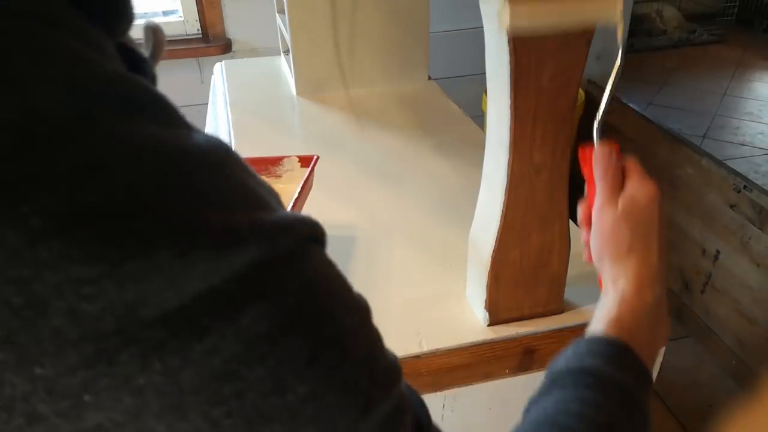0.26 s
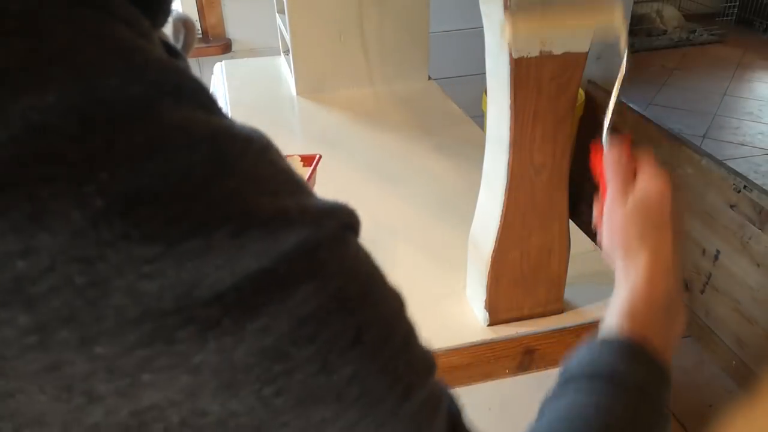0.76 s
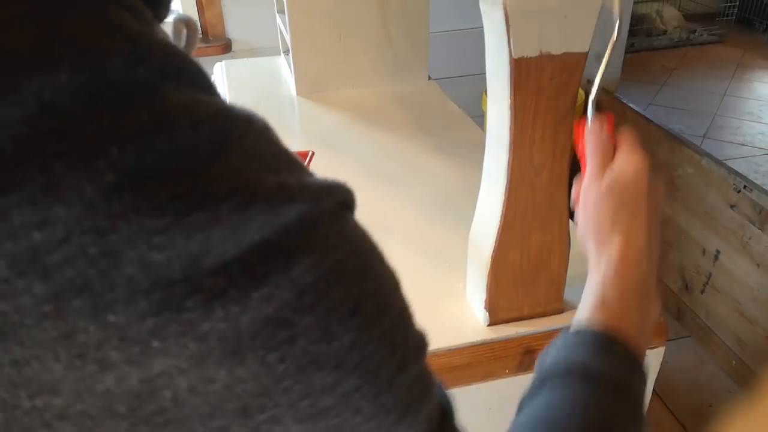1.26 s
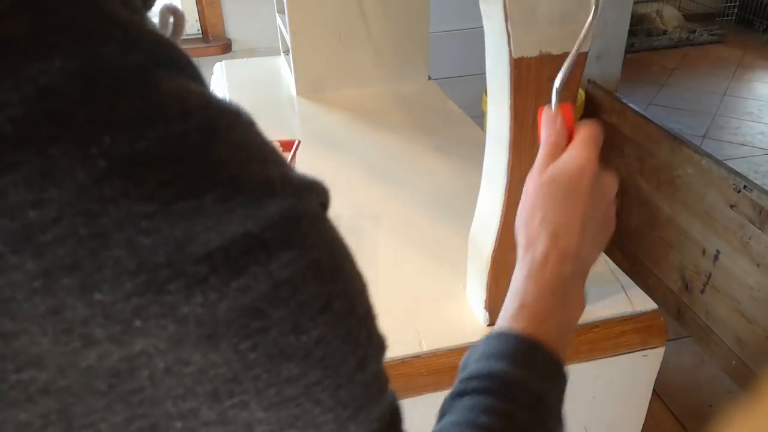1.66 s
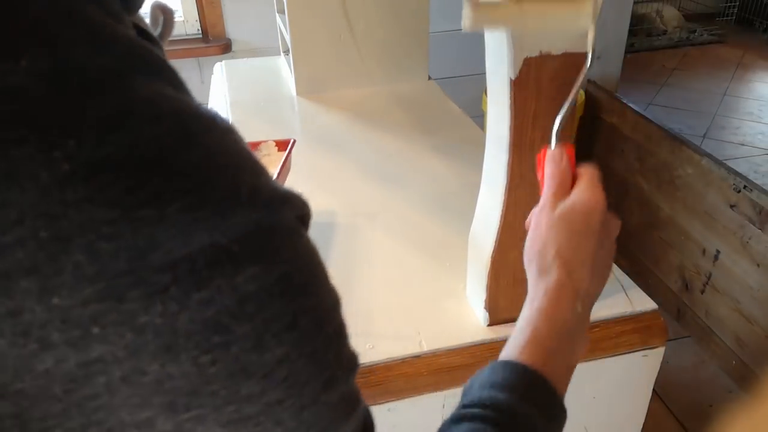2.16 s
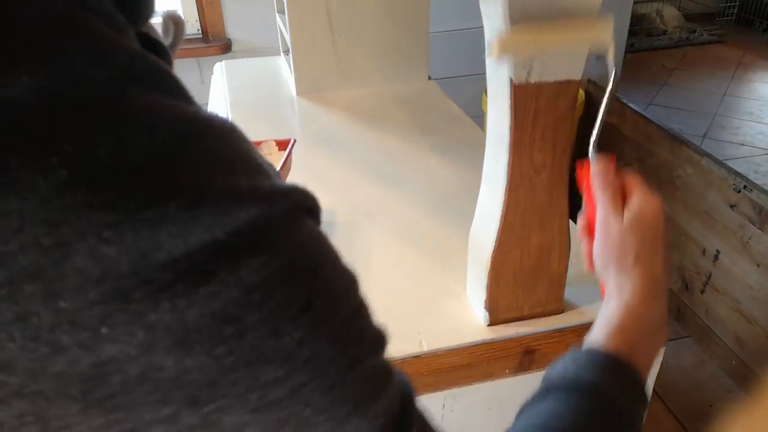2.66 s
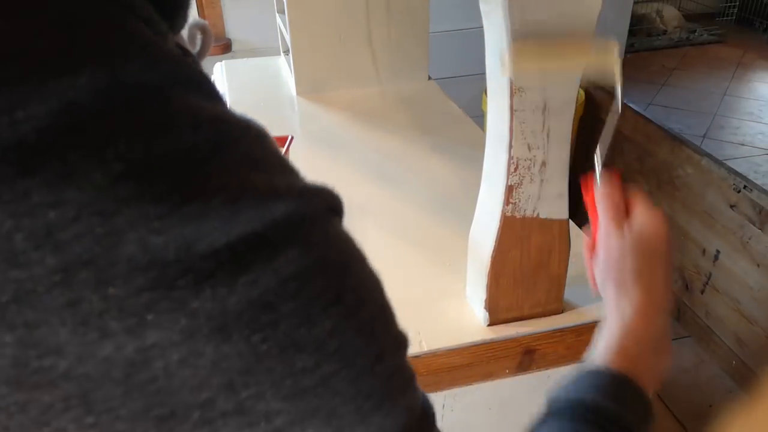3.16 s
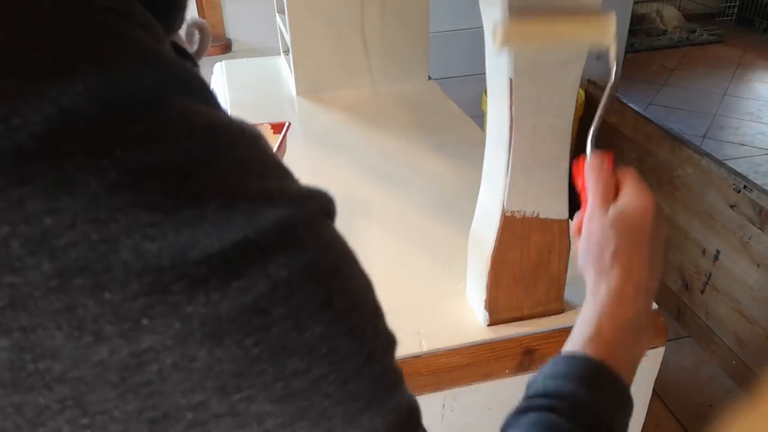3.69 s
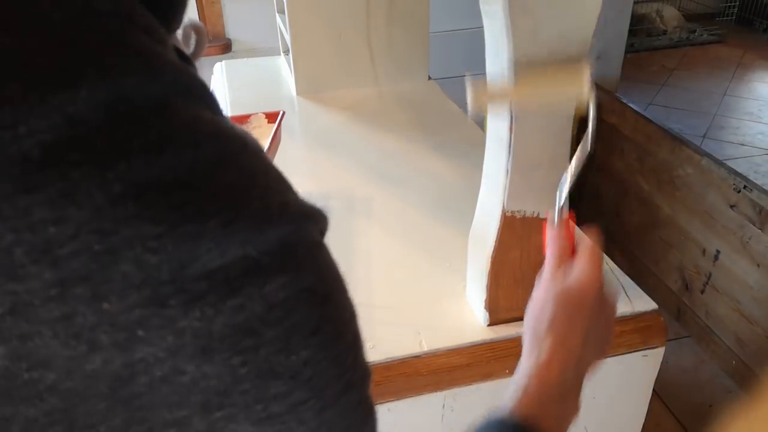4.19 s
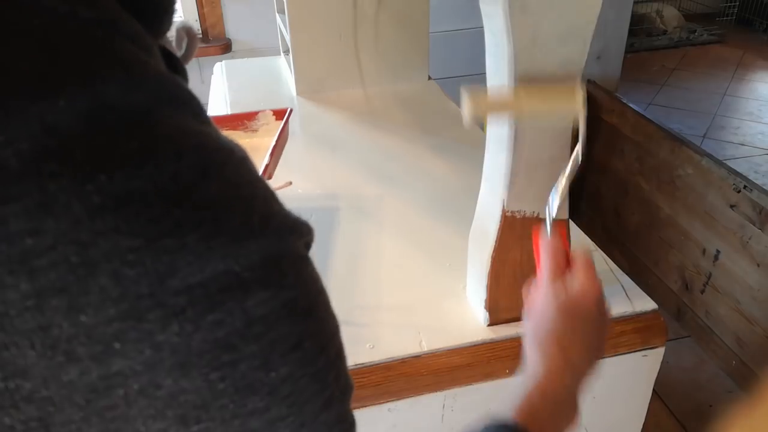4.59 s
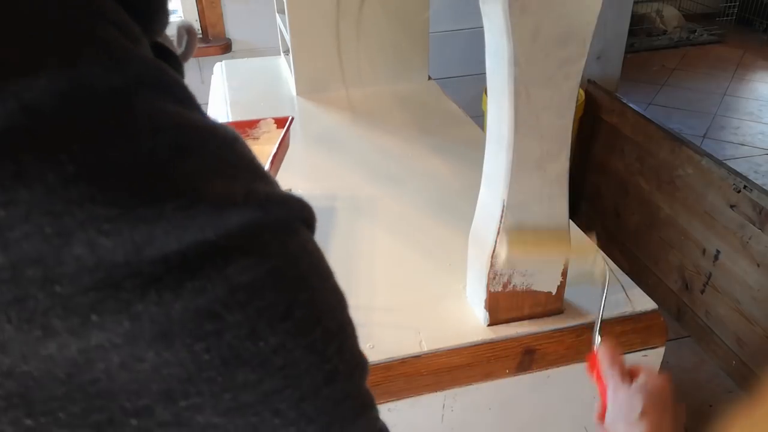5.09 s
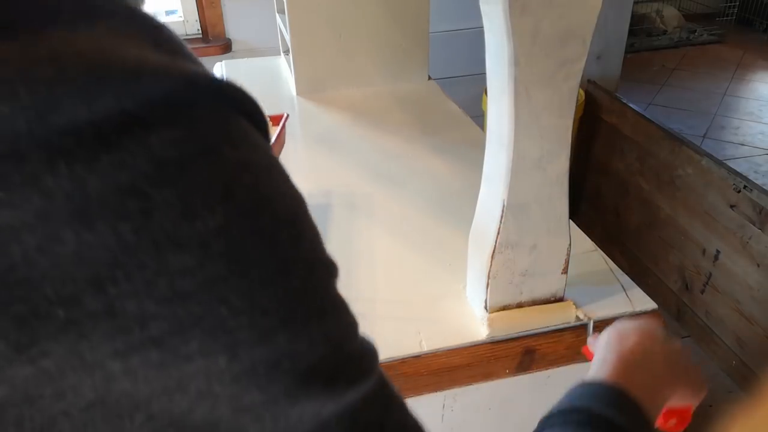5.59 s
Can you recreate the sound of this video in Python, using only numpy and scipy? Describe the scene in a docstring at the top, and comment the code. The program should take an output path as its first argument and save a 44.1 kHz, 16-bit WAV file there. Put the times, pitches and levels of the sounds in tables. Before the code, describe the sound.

A small paint roller works up and down a wooden cupboard post, close to the microphone in a hard-walled room. Its plastic sleeve clacks and rattles on the wire axle while wet paint hisses softly and the hollow wood booms faintly. After a short lull of light rubbing, the strokes resume and peak late. The roller then knocks onto a shelf, followed by soft low thuds.

```python
"""A small paint roller works up and down a wooden cupboard post indoors, close to a two-port camera.
From the first strokes its plastic sleeve clacks and rattles on the wire axle, wet paint hisses as it
peels and the hollow cupboard booms under the pressure. After 1.3 s the idling sleeve only rubs lightly;
the strokes resume at 2.2 s and are loudest near 4.8 s. At 5.4 s the roller lands on the shelf, then the
cupboard rocks on the floor. Throughout, a hard-walled room answers over a mains hum."""
import sys
import numpy as np
from scipy import signal
from scipy.fft import rfft, irfft, next_fast_len
from scipy.io import wavfile
from scipy.ndimage import uniform_filter1d, map_coordinates

SR = 44100
rng = np.random.default_rng(int(sys.argv[2]) if len(sys.argv) > 2 else 0)


def file_out(sig):
    """Save sig as 16-bit WAV at sys.argv[1]."""
    # one column per channel
    cols = np.atleast_2d(sig).T
    # limit, then scale
    lim = np.clip(cols, -1, 1)
    pcm = np.round(lim * 32767).astype(np.int16)
    wavfile.write(sys.argv[1], SR, pcm)


N = 257984

# Clacks of the sleeve; the one at 3.001 s is a wall echo of the clack just before:
# t/s, level/dB, knock f/Hz, hardness/dB, wire ring/dB
SLEEVE_CLACKS = [(0.011, -47, 1280, -17, -40.5), (0.145, -47, 1360, -9, -35), (0.211, -16, 1300, 0, -22),
                 (0.319, -34.5, 1420, -7, -14), (0.355, -37.5, 1260, -9, -10),
                 (0.4439, -31.5, 1350, -3.5, -44), (0.574, -33, 1510, -10, -42),
                 (0.594, -31.5, 1630, -15, -44), (0.7611, -21, 1120, -0.5, -13),
                 (0.7637, -25.5, 1350, -2.5, -33), (0.944, -25, 1640, -11, -37),
                 (1.115, -23.5, 1200, -11, -28), (2.267, -33, 1240, -7, -36),
                 (2.334, -23.5, 1234, -11.5, -38), (2.35, -39, 1090, 13, -25), (2.429, -34, 1770, -11, -33),
                 (2.4393, -35, 1610, -11, -30), (2.476, -25, 1930, 4.5, -5),
                 (2.596, -32.5, 1250, -1.5, -28), (2.982, -40, 1445, 1.5, -26),
                 (2.994, -25.5, 1550, 1.5, -4.5), (3.0013, -29.5, 1390, 5.5, -12),
                 (3.0565, -27.5, 1560, -12, -28), (3.0791, -24.5, 1060, -3.5, -23),
                 (3.083, -28.5, 1290, 1, -11), (3.103, -38, 1090, -10, -28), (3.122, -39, 1180, -21, -28),
                 (3.481, -45, 1440, -11, -15), (3.522, -32.5, 1360, -28, -28),
                 (3.5278, -16.5, 1530, -2.5, -10), (3.543, -27, 1600, 2.5, -10),
                 (3.58, -25.5, 1200, -4, -8), (3.601, -25.5, 1090, -8, -23), (3.605, -29.5, 1440, 12, -7),
                 (3.801, -41, 1410, -33, -44), (3.827, -42, 1230, -17, -40),
                 (4.4413, -47.5, 1220, -5.5, -51), (4.623, -34.5, 1830, -1.5, -40),
                 (4.714, -30, 1560, -20, -36), (4.7508, -6, 1620, -4, -10.5), (4.870, -14, 1320, 5.5, -7.5),
                 (4.8752, -14.5, 1580, -18, -24), (4.947, -24, 1440, -4.5, -15),
                 (5.117, -37.5, 1980, -14, -33), (5.399, -46, 1440, 0, -35),
                 (5.4148, -23.5, 1530, -10, -28), (5.4175, -12.5, 1560, -4.5, -21),
                 (5.558, -25, 1480, -11, -45)]
# Timbre along the post, brighter high up: t/s, sleeve f/Hz, crack at hardness 0/dB, low sleeve mode/dB
SLEEVE_TIMBRE = [(0, 3010, -14.5, -7.5), (2.5, 3070, -10.5, -5), (2.999, 2960, -25, -24),
                 (5.8, 2850, -16, -8)]
# First wall reflections: delay/s, left level/dB, right level/dB
WALL_ECHOES = [(.0059, -15, -11.5), (.0097, -12, -10.5), (.0159, -16, -24)]
# The left port hears more of the sleeve's treble: f/Hz, left minus right/dB
SLEEVE_BALANCE = [(700, 9), (1300, -2), (2400, 2), (4400, 2.5), (8000, 12.5)]
def clacks():
    """Impact excitation: the harder the contact, the shorter the knock and the stronger the treble."""
    out = np.zeros((2, N + SR))
    when, sleeve_hz, crack_db, low_db = np.transpose(SLEEVE_TIMBRE)
    crack = click(5270, life=0.00023)
    low_mode = click(2270, life=0.0006)
    edge = np.roll(click(7700, life=0.00006), 12)  # the contact breaks at the crest of the blow
    for start, db, hz, hard_db, wire_db in SLEEVE_CLACKS:
        sleeve = click(np.interp(start, when, sleeve_hz) * (1 + 0.04 * rng.standard_normal()), 0.00036)
        sleeve += amp(np.interp(start, when, low_db)) * low_mode
        wire = amp(wire_db) * click(4330 * (1 + 0.008 * rng.standard_normal()), life=0.00076)
        cycles_to_crest = 0.4 + 0.0633 * max(-hard_db, 0)  # soft taps ring longer
        knock = click(hz, life=cycles_to_crest / hz)
        bright_db = 0.72 * hard_db
        blow = knock - amp(hard_db) * sleeve + amp(np.interp(start, when, crack_db) + bright_db) * crack
        direct = blow + amp(bright_db - 27) * edge + amp(-7) * wire  # the wire points away from the ports
        path = room_tail(onset=0.0043)
        for delay, *wall_db in WALL_ECHOES:
            path[:, round(delay * SR)] += amp(wall_db)
        path *= amp([[-1.5], [-3.5]])  # left, right
        heard = signal.fftconvolve(path, (blow + wire)[None], axes=1)
        heard[0, :len(direct)] += direct
        heard[1, 3:len(direct) + 3] += direct  # the right port lies a little further away
        out[:, round(start * SR):][:, :heard.shape[1]] += amp(db) * heard
    return tilted(out[:, :N], SLEEVE_BALANCE)


def click(hz, life):
    """Damped oscillation: a blow swells to its crest in life seconds, then rings down."""
    age = np.arange(SR // 25) / SR / life
    shape = age * age * np.exp(-2 * age) * np.sin(2 * np.pi * hz * life * age)
    return shape / np.abs(shape).max()


def small_radiator(x):
    """Radiation efficiency: an object smaller than the wavelength gives off little bass."""
    return filtered(x, lambda hz: hz ** 6 / np.sqrt(hz ** 12 + 880. ** 12))


# Roller strokes: t/s, length/s, paint level/dB, chatter level/dB, boom level/dB, panel level/dB
ROLLER_STROKES = [(0.148, 0.19, -55.5, -48.5, -52, -65.5), (0.256, 0.29, -58, -53.5, -58, -72),
                  (0.493, 0.21, -56, -60.5, -59.5, -73), (0.687, 0.19, -51.5, -46, -51.5, -53.5),
                  (0.817, 0.22, -52.5, -53, -56, -68.5), (0.99, 0.22, -56, -59.5, -73, -74),
                  (1.153, 0.17, -64.5, -72, -63, -72), (2.192, 0.19, -71, -56.5, -67, -85),
                  (2.297, 0.32, -53.5, -48, -55.5, -101), (2.486, 0.23, -59, -59.5, -56.5, -74.5),
                  (2.688, 0.34, -58, -71.5, -80, -69), (2.963, 0.25, -51, -48, -50, -64),
                  (3.082, 0.45, -62, -95, -78, -101), (3.473, 0.25, -54.5, -47.5, -58.5, -66.5),
                  (3.726, 0.21, -59.5, -85, -70, -87), (4.088, 0.25, -67.5, -84, -81, -104),
                  (4.579, 0.29, -49.5, -60, -58, -58), (4.764, 0.26, -51.5, -40.5, -49, -52.5),
                  (4.974, 0.24, -52, -68, -68.5, -57.5), (5.355, 0.16, -56, -47, -51, -77),
                  (5.519, 0.22, -84, -61, -87, -100)]
def stroke_gain(name, lag=0, stretch=1, sharp=2):
    """Amplitude modulation: each stroke swells once to its level in the named column."""
    column = ["paint", "chatter", "boom", "panel"].index(name)
    return sum(amp(levels[column]) * swell(start + lag, length * stretch, sharp)
               for start, length, *levels in ROLLER_STROKES)


# Spectrum of the chatter: f/Hz, relative density level/dB
RATTLE_SPECTRUM = [(500, -13.5), (900, 0), (1400, -1.5), (2000, -3), (3000, -5.5), (4400, -13), (5500, -17),
                   (8000, -39.5), (12000, -53)]
def rattle():
    """Random impacts: the turning sleeve chatters on its axle, heard direct and through the room."""
    level = stroke_gain("chatter", stretch=1.02, sharp=2.8) + amp(-72.5)
    impacts = crackle(rate=180, spread_db=3.5)
    knocks = level * unit(filtered(impacts, lambda hz: amp(along(RATTLE_SPECTRUM, hz))))
    reverb = signal.fftconvolve(knocks[None], room_tail(onset=0.0015), axes=1)[:, :N]
    return tilted(0.55 * knocks + 0.83 * reverb, SLEEVE_BALANCE)


# Spectrum of peeling paint: f/Hz, relative density level/dB
PAINT_SPECTRUM = [(500, -53), (1500, 10), (4000, 1), (7000, -7.5), (10000, -8.5), (15000, -8.5)]
# The paint is nearer the left port: f/Hz, left minus right/dB
PAINT_BALANCE = [(1500, 2), (4400, 9.5), (8000, 18.5), (15000, 10)]
def paint():
    """Shot noise: countless snapping paint threads merge into a fine, patchy hiss."""
    threads = 0.44 * unit(crackle(rate=1500, spread_db=6.6)) + rng.standard_normal((2, N))
    spectra = signal.stft(threads, nperseg=256)[2]
    patches = uniform_filter1d(rng.standard_normal(spectra.shape[1:]), size=14, axis=0)  # over frequency
    patches = uniform_filter1d(patches, size=8, axis=1)  # over time
    threads = signal.istft(spectra * amp(1.85 * unit(patches)), nperseg=256)[1][:, :N]
    hiss = filtered(threads, lambda hz: amp(along(PAINT_SPECTRUM, hz)))
    level = stroke_gain("paint", sharp=1.93) * amp(0.19 * wobble(47))
    return level * unit(tilted(hiss, PAINT_BALANCE))


# Modes of the hollow body and of its side panel, per filter pass: f/Hz, bandwidth/Hz, level/dB
BODY_MODES = [(147.5, 15.4, 2), (97, 9.3, -3), (194, 120, -7)]
PANEL_MODES = [(309, 35.7, 3.5), (434, 62, 0.5)]
def cupboard():
    """Forced vibration: uneven rolling shakes body and panel; landing on the shelf jolts both."""
    landing_s, rise_s, fade_db_per_s = 5.405, 0.04, 128
    after = np.clip(np.arange(N) / SR - landing_s, 0, None)
    jolt = amp(-29.5 - fade_db_per_s * after) * np.clip(after / rise_s, 0, 1) ** 2
    boom = shaken(rng.standard_normal(N) + 0.18 * rng.standard_normal((2, N)), BODY_MODES)
    panel = shaken(rng.standard_normal(N) + 0.98 * rng.standard_normal((2, N)), PANEL_MODES)
    press = dict(lag=0.017, stretch=1.166, sharp=2.26)  # the hand presses hardest late in a stroke
    boom_gain = stroke_gain("boom", **press) + jolt
    panel_gain = stroke_gain("panel", **press) + amp(-10) * jolt + amp(-69.5)  # it never rests
    return boom_gain * boom + panel_gain * panel


def shaken(force, modes):
    """Resonance: a rough force passes twice through the modes; steady rolling evens out the swings."""
    ring = unit(filtered(force, lambda hz: resonances(modes, hz) ** 2))
    envelope = np.sqrt(np.abs(uniform_filter1d(ring ** 2, size=1500)))
    return unit(ring / (0.5 + envelope))


# Light rubs of the sleeve: t/s, level/dB, f/Hz, bandwidth per filter pass/Hz, length/s
RUBS = [(0.425, -52, 2870, 780, 0.11), (1.575, -63.5, 1750, 500, 0.18), (2.004, -65, 1500, 446, 0.093),
        (2.163, -62, 1490, 400, 0.12), (3.475, -63, 1676, 300, 0.057), (3.77, -54.5, 1600, 600, 0.12),
        (4.613, -48, 1770, 930, 0.1)]
def squeaks():
    """Friction noise: the idling sleeve rubs in a band that sinks as it slows."""
    out, n = np.zeros((2, N + SR)), SR // 4
    for start, db, hz, width, length in RUBS:
        rub = rng.standard_normal(n) + 1.1 * rng.standard_normal((2, n))
        fast, slow = (unit(filtered(rub, lambda f: resonances([(centre, width, 0)], f) ** 2))
                      for centre in (hz, hz - 0.51 * width))
        crossfade = np.clip(np.arange(n) / SR / length, 0, 1) * np.pi / 2
        band = np.cos(crossfade) * fast + np.sin(crossfade) * slow
        out[:, round(start * SR):][:, :n] += amp(db) * swell(0, length, sharp=1.3)[:n] * band
    return out[:, :N]


# The cupboard rocks on the floor: t/s, level/dB, f/Hz, length/s
FLOOR_THUDS = [(5.513, -45, 48.4, 0.19), (5.584, -47.5, 100, 0.1)]
def thuds():
    """Structure-borne sound: soft, low pushes travel through the floor."""
    t = np.arange(N) / SR
    return sum(amp(db) * swell(start, length) * np.sin(2 * np.pi * hz * (t - start))
               for start, db, hz, length in FLOOR_THUDS)


# Reverberation time of the room: f/Hz, T60/s
REVERB_TIMES = [(800, 0.31), (1500, 0.29), (3000, 0.34), (4600, 0.34), (10000, 0.083)]
def room_tail(onset):
    """Reverberation: reflections build up over onset seconds; each frequency decays at its own rate."""
    hz, t, spectra = signal.stft(rng.standard_normal((2, SR // 3)), SR, nperseg=256)
    decay = amp(-60 * t / along(REVERB_TIMES, hz)[:, None])
    tail = signal.istft(spectra * decay, SR, nperseg=256)[1]
    t = np.arange(tail.shape[1]) / SR
    lumps = np.repeat(rng.standard_normal((2, len(t) // 40 + 1)), 40, axis=1)[:, :len(t)]
    tail *= np.clip(t / onset, 0, 1) ** 2
    tail *= amp(5.45 * lumps * np.exp(-t / 0.035))  # early reflections are uneven
    return tail / np.linalg.norm(tail, axis=1, keepdims=True)


# Partials of the hum: f/Hz, rms level/dB
HUM_PARTIALS = [(49.6, -64.5), (99.3, -70.5)]
def mains_hum():
    """Harmonics: the mains frequency and its octave, slightly unsteady in level and phase."""
    t = np.arange(N) / SR
    return sum(np.sqrt(2) * amp(db + 0.33 * wobble(2.3))
               * np.sin(2 * np.pi * hz * t + 0.063 * wobble(1.4)) for hz, db in HUM_PARTIALS)


# Spectrum of the quiet room: f/Hz, relative density level/dB
AIR_SPECTRUM = [(20, -5), (74, -12.5), (107, -27), (130, -12), (228, -14.5), (316, -7.5), (392, -22),
                (500, -7), (834, -26.5), (1640, -24), (2150, -29), (5000, -33), (15000, -39)]
# Likeness of the air at the two ports: f/Hz, correlation/1
AIR_CORRELATION = [(60, 0.94), (180, 0.84), (550, -0.5), (1650, 0.2), (15000, -0.17)]
def room_air():
    """Partial coherence: ambient noise reaches both ports alike only in the bass."""
    def colour(hz):
        angle = np.arccos(np.clip(along(AIR_CORRELATION, hz), -1, 1)) / 2
        return amp(along(AIR_SPECTRUM, hz)) * (hz > 20) * [np.cos(angle), np.sin(angle)]
    mid, side = filtered(rng.standard_normal((2, N)), colour)
    rms_above_bass = np.std(filtered(mid, lambda hz: hz > 200))
    return amp(-66.5 + 0.12 * wobble(8.0)) * np.array([mid + side, mid - side]) / rms_above_bass


def amp(db):
    """Decibels to amplitude ratio."""
    return 10 ** (np.asarray(db) / 20)


def unit(x):
    """Normalisation to rms 1."""
    return x / np.sqrt(np.mean(x ** 2) + 1e-20)


def along(points, hz):
    """Interpolation of (f/Hz, value) points on a log frequency axis."""
    f, values = np.transpose(points)
    return np.interp(np.log(hz + 1), np.log(f + 1), values)


def wobble(rate):
    """Random modulation: a smooth curve through rate knots a second."""
    return map_coordinates(rng.standard_normal(int(N * rate / SR) + 4), [np.arange(N) * rate / SR])


def swell(start, length, sharp=2):
    """Sine-power window: one soft rise and fall."""
    out, n = np.zeros(N), round(length * SR)
    part = out[max(round(start * SR), 0):][:n]
    part += np.abs(np.sin(np.pi * np.arange(len(part)) / n)) ** sharp
    return out


def crackle(rate, spread_db):
    """Poisson process: rate clicks a second, many small and a few larger."""
    chance, polarity, strength = rng.random((3, N))
    size = np.minimum(-np.log(strength + 1e-9), 2.5)
    return (chance < rate / SR) * np.sign(polarity - 0.5) * amp(spread_db * size)


def filtered(x, response):
    """Linear filtering: the spectrum of x times a frequency response."""
    m = next_fast_len(x.shape[-1] + SR // 4)
    return irfft(rfft(x, m) * response(np.fft.rfftfreq(m, 1 / SR)), m)[..., :x.shape[-1]]


def resonances(modes, hz):
    """Modal superposition: the response of damped modes, alternating in sign."""
    return sum((-1) ** k * amp(db) * 1j * hz * width / (centre ** 2 - hz ** 2 + 1j * hz * width)
               for k, (centre, width, db) in enumerate(modes))


def tilted(x, balance):
    """Level difference between the ports, half to each, varying with frequency."""
    return filtered(x, lambda hz: amp(np.outer([0.5, -0.5], along(balance, hz))))


def scene():
    """Superposition: all sources add at the two ports."""
    sleeve = small_radiator(clacks() + rattle())
    return sleeve + squeaks() + paint() + cupboard() + thuds() + mains_hum() + room_air()


def record(dry):
    """Band limiting: the camera keeps nothing above its cutoff."""
    return filtered(dry, lambda hz: hz < 15880)


dry = scene()
out = record(dry)
file_out(out)
```